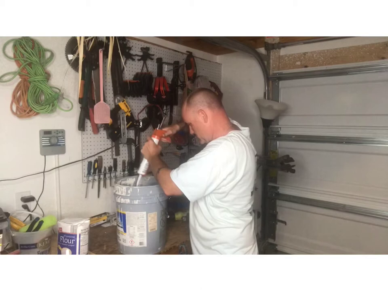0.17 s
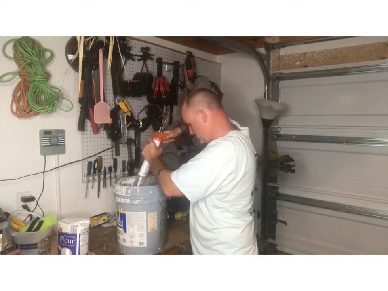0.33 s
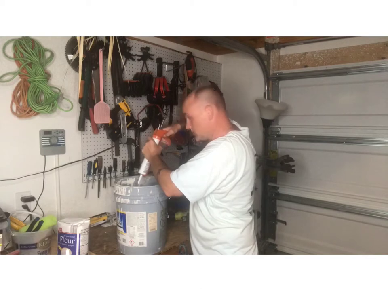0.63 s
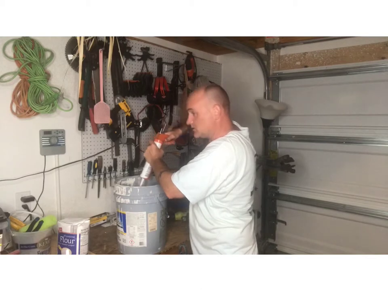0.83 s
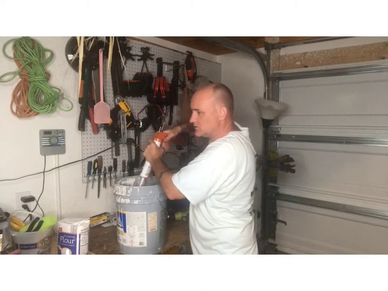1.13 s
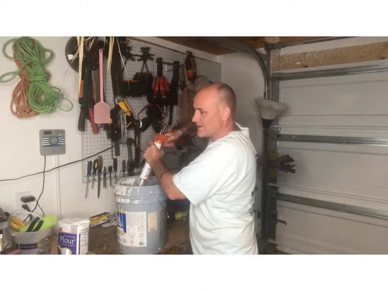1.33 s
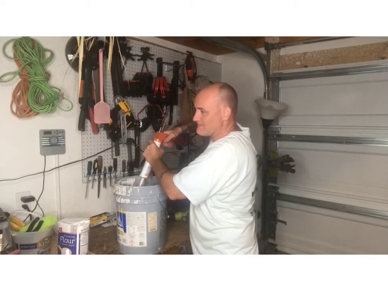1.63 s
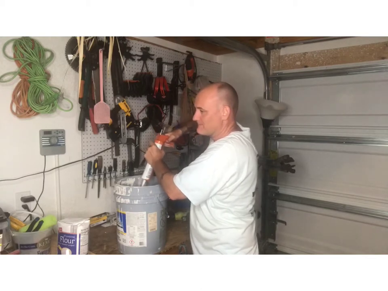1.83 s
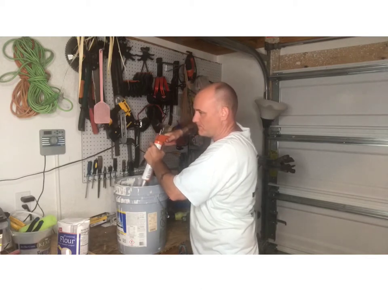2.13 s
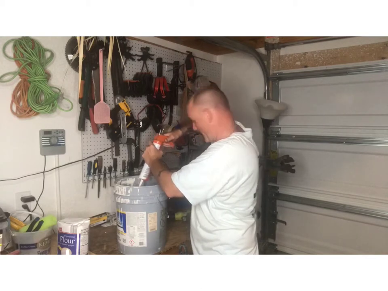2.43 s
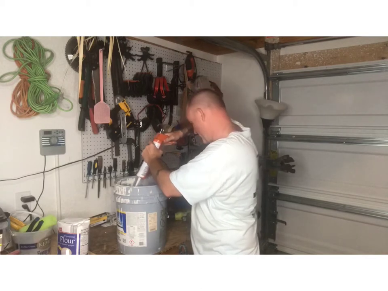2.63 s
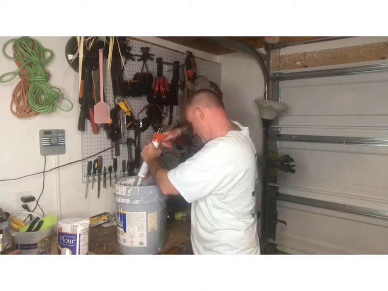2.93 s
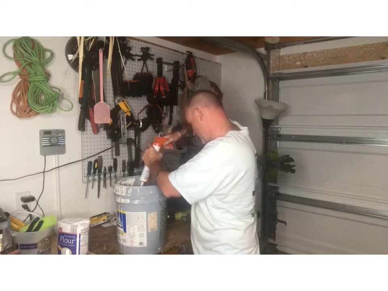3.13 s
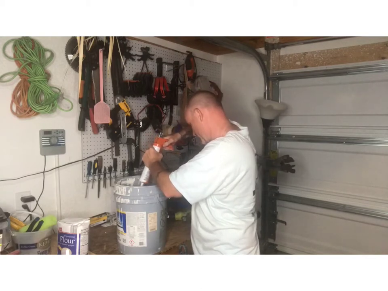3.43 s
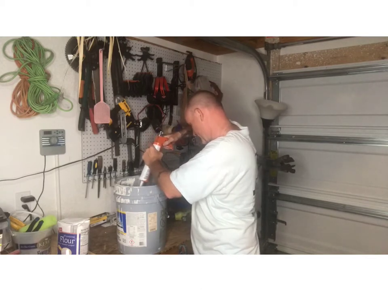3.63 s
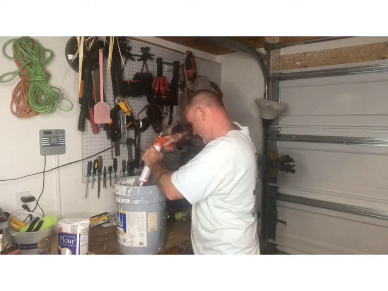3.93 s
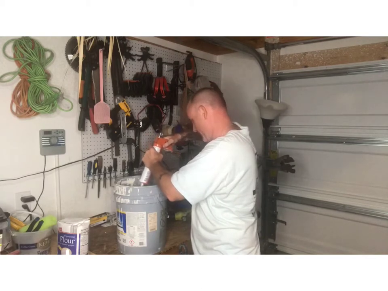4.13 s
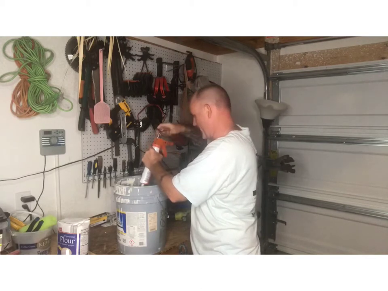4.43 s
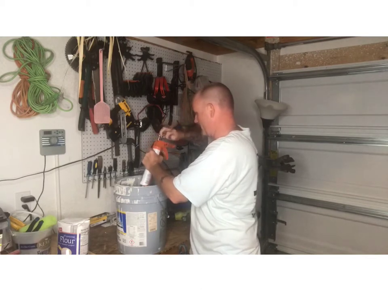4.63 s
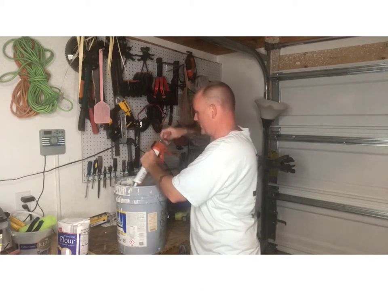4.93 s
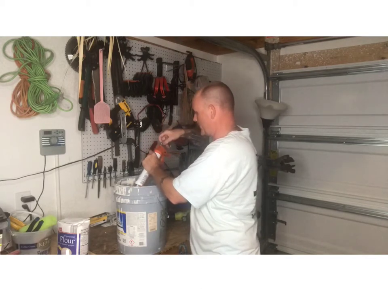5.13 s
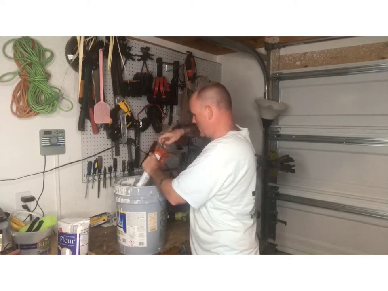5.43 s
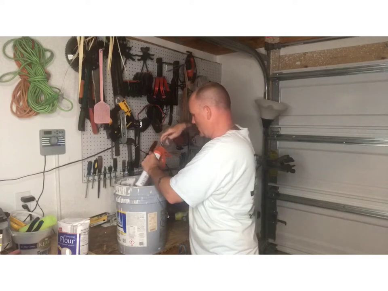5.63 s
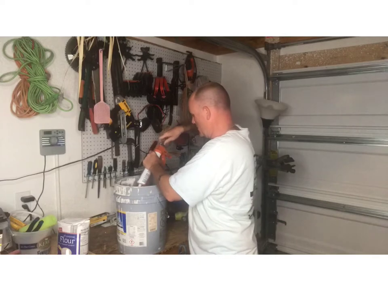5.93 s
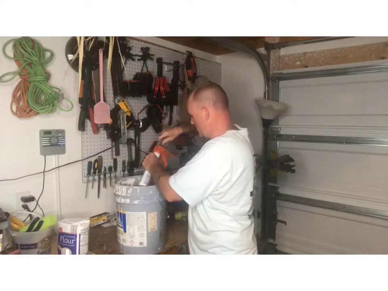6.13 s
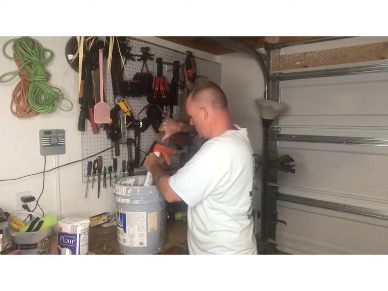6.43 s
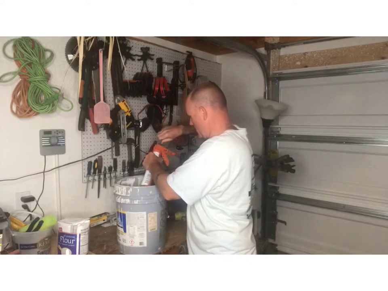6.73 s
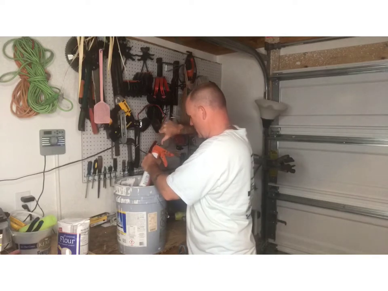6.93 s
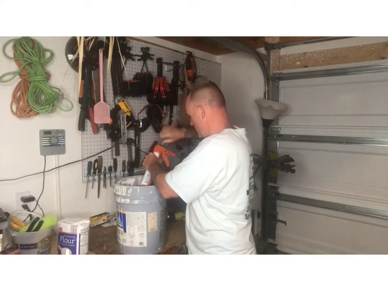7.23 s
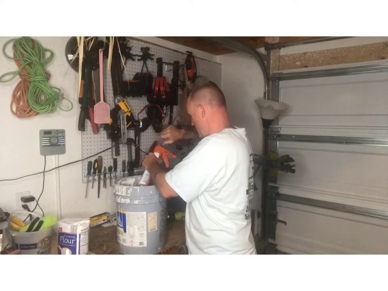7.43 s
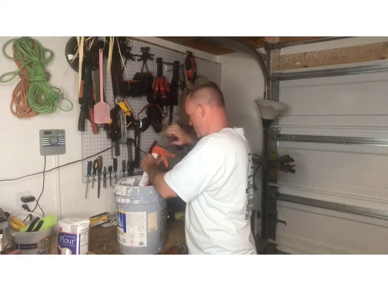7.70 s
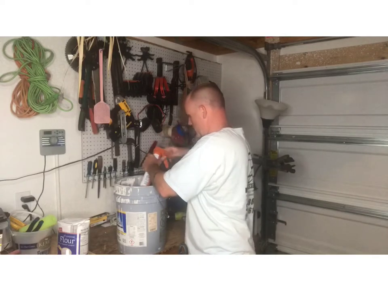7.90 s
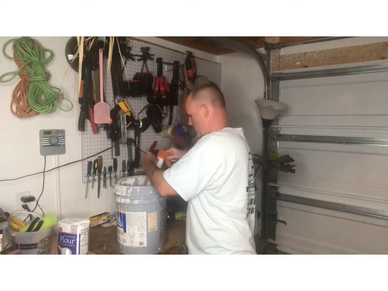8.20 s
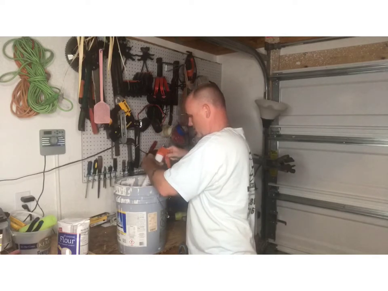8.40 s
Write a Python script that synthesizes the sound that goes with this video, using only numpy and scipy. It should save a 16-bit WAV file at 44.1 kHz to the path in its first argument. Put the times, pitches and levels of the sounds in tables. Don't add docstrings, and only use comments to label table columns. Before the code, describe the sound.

In a garage, a few metres from a phone, a metal caulking gun is pumped about twice a second: broken squeaks rise into squeals, each stroke ending in a hard steel snap. Then a quiet run of tiny catch ticks, a loud clack, rod scrapes and knocks, and finally soft dull bumps on a plastic bucket. A faint fast timer tick and low hum continue.

```python
import sys
import numpy as np
from scipy import signal
from scipy.fft import rfft, irfft, next_fast_len
from scipy.io import wavfile

SR = 44100
rng = np.random.default_rng(int(sys.argv[2]) if len(sys.argv) > 2 else 0)


def boost(x):
    u = np.asarray(x, float) / 20
    return 10 ** u


def inscribe(sig):
    pcm = np.round(np.clip(np.atleast_2d(sig).T, -1, 1) * 32767)
    wavfile.write(sys.argv[1], SR, pcm.astype(np.int16))


N = 377496
T = np.arange(N) / SR


def unit(x):
    return x / np.sqrt(np.mean(x ** 2))


def add(out, x, s):
    i = int(s * SR)
    x = x[max(-i, 0):N - i]
    out[max(i, 0):max(i, 0) + len(x)] += x


def colour(x, points):
    hz, db = np.transpose(points)
    n = next_fast_len(len(x) + 2048)
    log_hz = np.log(np.arange(n // 2 + 1) * SR / n + 1)
    gain = boost(np.interp(log_hz, np.log(hz), db))
    return irfft(rfft(x, n) * gain, n)[:len(x)]


def band(x, hz, width_hz):
    return signal.lfilter(*signal.iirpeak(hz, hz / width_hz, SR), x)


def fade(t, t60_s):
    return np.exp(-np.log(1000) * t / t60_s)


def walk(size, rate_hz):
    knots = rng.standard_normal(int(size * rate_hz / SR) + 2)
    return np.interp(np.arange(size) * rate_hz / SR, np.arange(len(knots)), knots)


# (time [s], length [s], first pitch [Hz],
# last pitch [Hz], level [dB])
SLIPS = [(0.35, 0.027, 893, 926, -47.5), (0.37, 0.04, 1003, 1116, -55.5), (.582, .013, 3480, 3560, -61),
         (0, .02, 3540, 3650, -48.5), (1.115, .028, 3600, 3700, -54), (1.672, .028, 3600, 3690, -48),
         (2.211, .025, 3540, 3650, -60), (2.82, .03, 3420, 3540, -52), (0.748, 0.036, 752, 760, -48.5),
         (0.775, 0.033, 876, 934, -46), (.806, 0.024, 1058, 1195, -44), (0.828, 0.02, 1085, 1052, -47),
         (0.847, .033, 880, 903, -46), (0.884, 0.023, 904, 914, -45), (0.904, 0.029, 1251, 1306, -41),
         (0.937, 0.014, 1286, 1280, -50), (0.975, 0.031, 1103, 1202, -53), (1.292, 0.025, 880, 918, -48.5),
         (1.34, 0.029, 930, 935, -49), (1.452, 0.024, 895, 930, -47.5), (3.013, 0.053, 812, 873, -49),
         (3.073, 0.029, 924, 1065, -50)]
# (time [s], pitch [Hz], level [dB], overtones [dB])
SQUEALS = [
    [(.205, 880, -50, 0), (.22, 868, -44.5, -0.5), (.237, 843, -50, 0), (.255, 847, -42.5, 1),
     (.266, 853, -46.5, -0.5), (.279, 896, -44, -1), (.292, 887, -47, 3)],
    [(.3, 980, -47, 0), (.31, 1030, -42, 0.5), (.322, 1106, -39, 1), (.336, 1110, -41.5, -1.5),
     (.35, 1127, -48, 4)],
    [(1.383, 1115, -47.5, 3), (1.397, 1124, -39.5, 0.5), (1.423, 1124, -32.5, -2), (1.436, 1118, -35, -2.5),
     (1.45, 1123, -46.5, -3.5)],
    [(1.464, 1000, -47, 3), (1.48, 1016, -43.5, 6), (1.494, 1028, -45.5, 3.5), (1.512, 1057, -45.5, 3.5),
     (1.525, 1087, -44.5, 1.5), (1.548, 1132, -52, -0.5)],
    [(1.877, 870, -53, 1.5), (1.9, 930, -47.5, 2.5), (1.91, 1054, -42, 0.5), (1.95, 1003, -38, 3.5),
     (1.975, 1071, -35.5, 1), (2.005, 1084, -32, 0), (2.03, 1030, -43, 1), (2.054, 1089, -33.5, -1),
     (2.1, 1106, -47.5, -3.5)],
    [(2.407, 933, -44, 2), (2.445, 902, -42, 2), (2.472, 955, -43, 1), (2.5, 1091, -39, 2),
     (2.535, 1065, -30.5, -5), (2.565, 1062, -30, -6), (2.578, 1061, -43, 1.5), (2.625, 1058, -32, -5),
     (2.657, 990, -45, 3)],
]


def slip_curves():
    short = [[(s, first_hz, db, 0), (s + length_s, last_hz, db, 0)] for s, length_s, first_hz, last_hz, db in SLIPS]
    return [*short, *SQUEALS]


# (frequency [Hz], width [Hz], level [dB])
FRAME = [(880, 300, -9.5), (1080.6, 58, 4), (1267, 130, -0.5), (1804, 160, 5), (2193, 180, -3.5),
         (2614, 120, 5), (3257, 220, -4), (3700, 420, 0.5), (4330, 650, -5.5), (6600, 900, -10)]
# (frequency [Hz], level [dB per Hz])
RUB = [(350, -56.5), (600, -23.5), (834, -33), (1070, -8.5), (1330, -22), (2150, -2.5), (2470, -12.5),
       (6550, -25), (16000, -39)]


def squeaks():
    train, rub = np.zeros(N), np.zeros(N)
    for rows in slip_curves():
        at, hz, level_db, over_db = np.transpose(rows)
        s, length_s = at[0], at[-1] - at[0]
        n = int(length_s * SR)
        u = np.arange(n) / n
        now = s + u * length_s
        db = np.interp(now, at, level_db)
        rough = np.clip(0.55 - 0.14 * s - 0.0062 * (db + 45), 0, 1)
        wander = .012 * walk(n, 50) + (.003 + .08 * rough) * walk(n, 350)
        wander = wander - .05 * np.exp(-u * length_s / .008)
        phase = 2 * np.pi * np.cumsum(np.interp(now, at, hz) * (1 + wander)) / SR
        k = np.arange(1, int(15000 / hz.max()) + 1)[:, None]
        shape_db = np.where(k > 1, 4, 1.5) * walk(n * len(k), 90).reshape(len(k), n)
        bright_db = np.interp(now, at, over_db) - 0.36 * (db + 45)
        shape_db = shape_db + (k > 1) * bright_db
        slope = np.maximum(1.0 - 2.15 * rough, 0)
        pulses = np.sum(boost(shape_db) * np.cos(k * phase) / k ** slope, axis=0)
        edges = np.minimum(1, np.minimum(u * length_s / 0.0062, (1 - u) * length_s / 0.0048))
        press = boost(db + 3.0 * rough * walk(n, 120)) * edges
        add(train, press * pulses, s)
        rubbing = (0.14 + rough) * (1 + 0.41 * np.cos(phase)) * rng.standard_normal(n)
        add(rub, press * boost(bright_db) * rubbing, s)
    frame = sum((-1) ** i * boost(db) * band(train, hz, width_hz) for i, (hz, width_hz, db) in enumerate(FRAME))
    return frame + boost(-21) * train + boost(17) * colour(rub, RUB)


# (frequency [Hz], level [dB per Hz])
CRACK = [(180, -54), (300, -3), (624, -25.5), (1690, -1.5), (3520, -3), (4830, -7.5), (6960, -7.5),
         (10000, -17.5), (14000, -20), (16000, -31)]


def ring(modes, damp, scatter_db, tone_db):
    t = T[:SR // 7]
    hz, db, t60_s = np.transpose(modes)[:, :, None]
    luck = rng.standard_normal((2, len(modes), 1))
    decay = fade(t, damp * np.minimum(t60_s, .4))
    beat = .6 + walk(len(t) * len(modes), 110).reshape(len(modes), -1)
    waves = np.sin(2 * np.pi * hz * (1 + 0.011 * luck[1]) * t)
    tones = boost(db + scatter_db * luck[0]) * beat * decay * waves
    crack = colour(1. * (np.arange(len(t)) == 40), CRACK)
    return (unit(crack) + boost(min(tone_db, 0)) * unit(tones.sum(0))) / np.sqrt(len(t))


def tilt(x, treble_db, cut_hz=700, mid_db=0):
    low = [(0.18 * cut_hz, -30), (0.69 * cut_hz, -6), (cut_hz, 0), (max(2400, 1.05 * cut_hz), 0)]
    high = [(4500, mid_db), (7000, treble_db), (13000, treble_db), (16000, treble_db - 1)]
    return colour(x, low + high)


def grit(size, rate_hz, spread_db):
    luck = rng.random((3, size))
    sizes = boost(-spread_db * np.log(luck[2]))
    return unit((luck[0] < rate_hz / SR) * np.sign(luck[1] - .5) * sizes + 1e-6)


def blow(body, rattle_s):
    t = T[:SR // 12]
    push = grit(len(t), 7000, 2.2) * np.exp(-t / np.clip(rattle_s, .003, .04)) * np.minimum(1, .35 + t / .003)
    y = signal.fftconvolve(push, body)
    peak = np.abs(y).max()
    return y / peak, push / peak


def thud(push, points):
    t = T[:SR // 20]
    knock = colour(rng.standard_normal(len(t)), points) * np.exp(-t / .004)
    return signal.fftconvolve(push, knock / np.sqrt(np.sum(knock ** 2)))


def cartridge(push, hz, t60_s):
    t = T[:SR // 3]
    note = (1 + .5 * walk(len(t), 35)) * np.sin(2 * np.pi * hz * t) * fade(t, t60_s)
    note = band(note, hz, 120)
    return signal.fftconvolve(push, note / np.sqrt(np.sum(note ** 2)))


# (snap time [s], peak [dB], rattle [s], cartridge level [dB], cartridge pitch [Hz])
STROKES = [
    (0.0428, -20, 0.011, -57, 410.4),
    (.597, -19.5, 0.021, -57.5, 384),
    (1.161, -16, .011, -57.5, 376),
    (1.721, -18.5, 0.011, -56.5, 349),
    (2.2665, -25, .016, -55, 337),
    (2.8754, -11, .004, -51, 327),
]
# (time [s], peak [dB], treble [dB], thud [dB])
BUMPS = [(0.0349, -23.5, -3, -35), (.486, -43.5, -12, 5), (.207, -45, -22, -20), (1.175, -27, -10, -25),
         (1.735, -29, -12, -25), (2.885, -22, -10, -25), (.608, -31.5, -2.5, -22),
         (0.6298, -25.5, -41, -35), (.565, -50, -30, -20), (1.137, -36, -17, -27), (1.693, -35, -12, -23),
         (1.7145, -27, -8, -23), (2.2425, -34, -8, -25), (2.2625, -29.5, -10, -25),
         (2.763, -57.5, -0.5, -24.5), (2.3463, -33.5, -24.5, -15.5), (2.4789, -27.5, -15.5, -9.5),
         (2.5616, -28.5, -33, -14), (2.85, -29.5, -14, -12.5), (2.864, -21, -4.5, -16),
         (3.091, -59, -21, -13.5)]
# (frequency [Hz], level [dB], t60 [s])
PUMPED = [(1740, 4, 1.0), (1800, -7.5, 0.58), (2120, -0.5, 5.0), (2640, -6.5, 0.092), (3340, -36.5, 0.24),
          (3640, 4.5, 0.15), (6660, -2, 0.029), (6890, -13, 0.22), (6560, -37, 5.0), (6930, -6, 0.6),
          (7500, -14, 0.14), (8200, -10, 0.21)]


def trigger_snaps():
    out = np.zeros(N)
    snaps = [(s, db, -8.5, -40 - db, rattle_s) for s, db, rattle_s, *_ in STROKES]
    bumps = [(*row, 0.0093) for row in BUMPS]
    for s, db, treble_db, thud_db, rattle_s in snaps + bumps:
        y, push = blow(ring(PUMPED, damp=.12, scatter_db=2, tone_db=-6), rattle_s)
        add(out, boost(db) * tilt(y, treble_db + 8, 1250), s)
        dull = thud(push, [(100, -20.5), (190, -5.5), (550, 1.5), (800, -8.5), (2000, -33.5)])
        add(out, boost(db + thud_db - 3.0) * dull, s)
    return out


# (time [s], shaken for [s], pitch
# [Hz], peak [dB], t60 [s])
NOTES = [(1.211, 0.19, 377, -52, 0.084), (3.748, 0.0045, 1100, -55, 0.016), (4.414, 0.011, 928, -52.5, 0.8),
         (8.035, 0.0086, 2095, -50, 0.1), (5.85, .03, 6600, -62, .04), (4.7, .01, 4350, -61, 0.089),
         (4.733, 0.024, 2290, -49, 0.12), (5.415, 0.03, 2290, -56, 0.06), (.21, .2, 1265, -56, .08),
         (2.877, .008, 3150, -24, .04), (6.295, 0.18, 319, -44.5, 0.13), (6.45, .06, 314, -46.5, 0.16)]


def lone_notes():
    out = np.zeros(N)
    booms = [(s + .03 - 0.013 * s, 0.12, hz, db, 0.093) for s, *_, db, hz in STROKES]
    for s, shaken_s, hz, db, t60_s in [*booms, *NOTES]:
        n = int(shaken_s * SR)
        shake = np.sin(2 * np.pi * hz * T[:n]) * np.linspace(1, 0, n) * (.3 + walk(n, 60))
        note = cartridge(shake, hz, t60_s)
        add(out, boost(db) * note / np.abs(note).max(), s)
    return out


# (time [s], peak [dB], treble [dB], thud [dB])
FREEING = [(4.3809, -29.5, -12, -18), (4.4116, -17.5, -5.5, -21), (4.4204, -21.5, -14, -25.5),
           (4.6064, -44.5, -17, -7.5), (4.6856, -37.5, -10, -29), (4.7333, -40, -37, -20),
           (4.7655, -47, -25, -17), (5.004, -49.5, -32, -19), (5.0237, -58, -20, -20),
           (5.1057, -59.5, -19, -11), (5.246, -60, -14, -6), (5.263, -57, -19.5, -20),
           (5.338, -51.5, -21, -25.5), (5.4142, -38.5, -17, -11), (5.5036, -47.5, -13, -7),
           (5.5464, -42, -14.5, -10), (5.6085, -24.5, -14, -15.5), (5.642, -22, -7.5, -20),
           (5.8281, -41, -19, -15), (5.8633, -48, -18, -20)]
# (time [s], peak [dB], treble [dB], thud [dB])
PULLING = [(6.1857, -42, -28.5, -7), (6.2298, -28.5, -17, -14.5), (6.2647, -27, -13, -17),
           (6.1992, -46, -13.5, -20), (6.3758, -31, -20, -17), (6.3958, -25.5, -14, -17.5),
           (6.452, -30, -15.5, -19), (6.8472, -34.5, -12, -12), (6.928, -29.5, -9.5, -17),
           (7.085, -52, -8, -12), (6.4321, -23.5, -11.5, -19), (6.47, -23.5, -20, -20.5),
           (6.6322, -43.5, -8.5, -18), (6.795, -33.5, -18.5, -21), (6.886, -31, -11, -12),
           (7.2233, -56, -31, -4), (7.2744, -43, -24, -15), (7.3287, -49, -20, -6),
           (7.4021, -29.5, -22, -21), (7.4901, -26.5, -15.5, -10.5), (7.6643, -43, -16, -18),
           (8.0285, -32, -15, -24)]
# (time [s], peak [dB], treble [dB], thud [dB])
LAYING = [
    (8.148, -49, -15, -4),
    (8.166, -44, -11, 2),
    (8.188, -42, -12, 3),
    (8.2879, -48, -22, -3),
    (8.3797, -38.5, -9, -1.5),
    (8.394, -42, -11, -1.5),
    (8.5205, -52, -18, -23),
]
# (frequency [Hz], level [dB], t60 [s])
HELD = [(1000, 1, 0.066), (1653, 1, 0.09), (1770, -3, 0.08), (2072, 1, 0.16), (2280, 3, .14),
        (2380, -8.5, .12), (2574, -5, .1), (2920, -8, 0.074), (3120, -3.5, 0.045), (3720, -6.5, 0.085),
        (4360, -6, 0.15), (6300, -17.5, 0.048), (6760, -17.5, .04)]


def knocks():
    out = np.zeros(N)
    # (knocks, cartridge [dB], deep part of the thud [dB], steel cut [Hz])
    stages = ((FREEING, -15, -7, 1900), (PULLING, -15, -7, 1500), (LAYING, -7.5, 12.5, 700))
    for rows, tube_db, deep_db, cut_hz in stages:
        for s, db, treble_db, thud_db in rows:
            rattle_s = 0.01 * boost(-0.04 * (db + 34.5))
            y, push = blow(ring(HELD, damp=.5, scatter_db=2, tone_db=-5), rattle_s)
            add(out, boost(db) * tilt(y, treble_db + 11.5, cut_hz, mid_db=0.5), s)
            add(out, boost(db + thud_db + tube_db + 8.5) * cartridge(push, 320, 0.12), s)
            dull = thud(push, [(90, deep_db - 24), (170, deep_db), (450, -5.5), (750, 7.0), (1050, 8.5),
                               (1600, -34.5)])
            add(out, boost(db + thud_db + 2.5) * dull, s)
    return out


# (time [s], peak [dB], rattle [s])
CATCH = [
    (3.774, -45.5, 0.01),
    (3.8854, -44, 0.0092),
    (3.983, -47.5, 0.0077),
    (4.0858, -43.5, 0.0084),
    (4.197, -47, 0.0067),
    (4.303, -66, 0.009),
]
# (frequency [Hz], level [dB], t60 [s])
SPRING = [(2980, -7, .4), (3540, 0, .1), (4240, -1, .2), (5640, 0.5, 0.14), (6080, 1, .1),
          (6710, -3, 0.1203), (7440, -1, .1), (7720, 0.5, .15), (9600, -5, 0.17), (11030, -8, .05),
          (11700, -3, 0.085)]


def catch_ticks():
    out = np.zeros(N)
    for s, db, rattle_s in CATCH:
        body = tilt(ring(SPRING, damp=.45, scatter_db=3.5, tone_db=-7), 7, 3400)
        add(out, boost(db) * blow(body, rattle_s)[0], s)
    return out


# (peak time [s], rise [s], fall [s], peak [dB], cartridge level [dB])
DRAGS = [(4.408, .065, .003, -44, -51), (4.63, .05, .12, -52, -80), (4.77, .1, 0.062, -53.5, -85),
         (5.43, .1, .08, -54, -63), (5.862, .045, .05, -46, -64.5), (7.15, .15, .2, -58.5, -68),
         (7.8, .25, .3, -68, -85), (7.282, .03, .05, -49, -78), (7.44, .06, 0.054, -40, -67),
         (8.03, .04, .2, -55, -68), (8.19, .12, 0.11, -54.5, -71), (8.395, .02, 0.099, -52, -62),
         (8.55, .1, .01, -58, -76)]
# (time [s], pressure [dB], cartridge level [dB])
PULLS = [
    [(5.545, -52, -78), (5.59, -47.5, -74), (5.612, -40, -70), (5.63, -38.5, -70), (5.646, -33, -67),
     (5.67, -45, -76), (5.73, -56, -80), (5.75, -62, -84)],
    [(6.187, -58, -67), (6.225, -48, -63.5), (6.258, -41, -60), (6.27, -34.5, -59), (6.305, -35.5, -50),
     (6.35, -49, -61)],
    [(6.35, -51, -60), (6.395, -39, -59), (6.415, -35.5, -54), (6.46, -37, -51), (6.468, -44, -61),
     (6.49, -45, -66), (6.56, -62, -72)],
    [(6.81, -62, -78), (6.83, -52, -73), (6.858, -41, -68), (6.89, -39, -68), (6.93, -38, -66),
     (6.945, -47, -64), (6.99, -51, -69), (7.05, -66, -73)],
]


def drag_shapes():
    depth_db = -29.5
    tube_depth_db = 0.44 * depth_db
    returns = [(s, .055, .002, -39, -60) for s, *_ in STROKES]
    shapes = [*PULLS]
    for s, rise_s, fall_s, db, tube_db in [*DRAGS, *returns]:
        low = (db + depth_db, tube_db + tube_depth_db)
        shapes.append([(s - rise_s, *low), (s, db, tube_db), (s + fall_s, *low)])
    return shapes


def slides():
    out = np.zeros(N)
    for rows in drag_shapes():
        at, level_db, tube_db = np.transpose(rows)
        s = at[0]
        t = np.arange(s, min(at[-1], N / SR), 1 / SR)
        db = np.interp(t, at, level_db)
        grains = grit(len(t), 6000, 1.8) * boost(-2 + 1.5 * walk(len(t), 150))
        push = grains * boost(db)
        part = np.floor(3 * (np.cumsum(np.full(len(t), 25 / SR)) % 1))
        steel = 0
        for k in range(3):
            body = ring(HELD, damp=.5, scatter_db=2.5, tone_db=-3)
            steel = steel + signal.fftconvolve(push * (part == k), body)
        add(out, tilt(steel, -15.5, 900, mid_db=-3), s)
        scrape = push * boost(-8 + .3 * (db + 40))
        add(out, colour(scrape, [(2500, -24), (4200, 3), (6000, 6), (10000, -2), (16000, -13)]), s)
        add(out, cartridge(grains * boost(np.interp(t, at, tube_db)), 322.2, 0.1), s)
    return out


def timer():
    out, t = np.zeros(N), T[:SR // 20]
    tick = np.sin(2 * np.pi * 1180 * t) * np.exp(-t / 0.0016)
    tick = tick + 0.46 * np.sin(2 * np.pi * 600 * t) * np.exp(-t / 0.0011)
    first_s, period_s = .079, .3335
    for s in np.arange(first_s, N / SR, period_s):
        add(out, boost(-52 + 0.5 * rng.standard_normal()) * tick, s)
    return out


# (frequency [Hz], t60 [s])
GARAGE = [(200, 0.51), (400, 0.71), (800, 0.36), (1600, 0.47), (3200, 0.31), (6400, 0.31), (12000, 0.22)]


def garage(x, wet_db):
    t, tail = T[:SR], 0
    for hz, t60_s in GARAGE:
        tail = tail + band(rng.standard_normal(SR), hz, 0.5 * hz) * fade(t, t60_s)
    tail = tail * np.clip(t / 0.0062, 0, 1)
    return x + boost(wet_db) * signal.fftconvolve(x, tail / np.sqrt(np.sum(tail ** 2)))[:N]


# (frequency [Hz], level [dB per Hz])
HISS = [(44, -31.5), (75, -5), (88, -12), (123, -5), (147, -16), (225, -15), (258, -16.5), (301, -17),
        (505, -20), (828, -22.5), (1160, -25), (1590, -28.5), (16000, -41.5)]
# (frequency [Hz], width [Hz], level [dB])
HUM = [(58, 1.9, -71.5), (61.6, 2, -76), (44, 32, -86)]


def floor():
    hiss = colour(rng.standard_normal(N), HISS)
    above = signal.sosfilt(signal.butter(4, 140, "high", fs=SR, output="sos"), hiss)
    hum = 0
    for hz, width_hz, db in HUM:
        unsteady = unit(band(rng.standard_normal(N), hz, width_hz))
        hum = hum + boost(db) * unit(np.sin(2 * np.pi * hz * T) + 0.62 * unsteady)
    return boost(-73 + 0.32 * walk(N, 1.9)) * hiss / np.std(above) + hum


def scene():
    gun = squeaks() + trigger_snaps() + lone_notes() + knocks() + catch_ticks() + slides()
    return (garage(gun, wet_db=-8.5) + timer() + floor())[None]


def roll_off(x):
    return signal.sosfilt(signal.butter(12, 15950, fs=SR, output="sos"), x)


def record(dry):
    mix = np.tanh(4 * dry) / 4
    return roll_off(mix)


dry = scene()
out = record(dry)
inscribe(out)
```